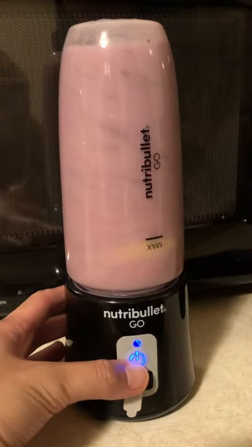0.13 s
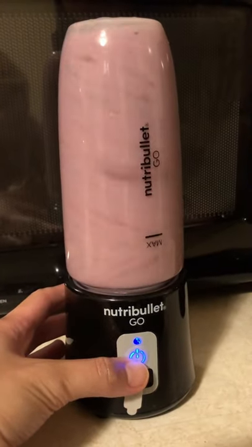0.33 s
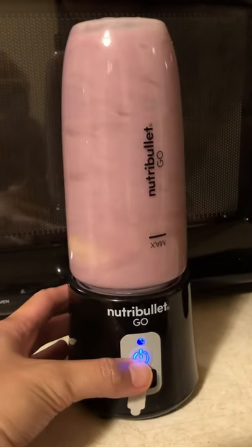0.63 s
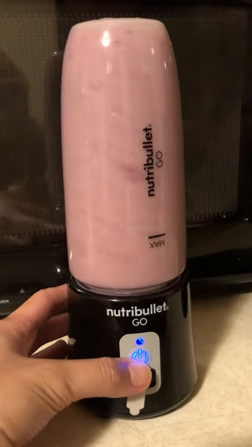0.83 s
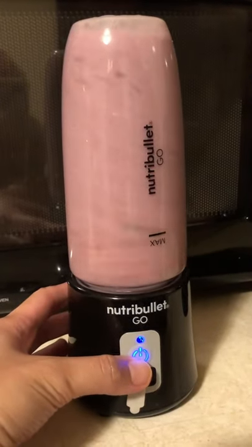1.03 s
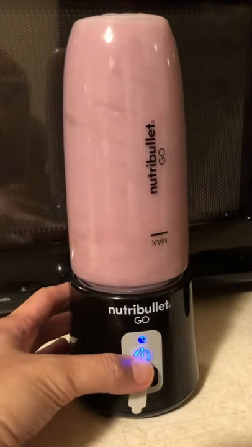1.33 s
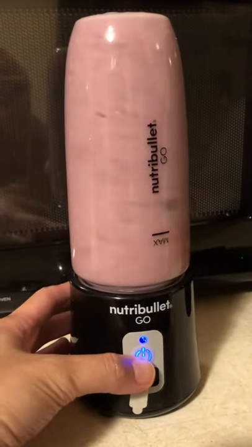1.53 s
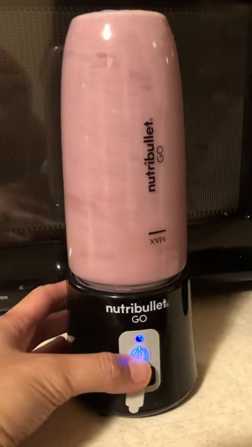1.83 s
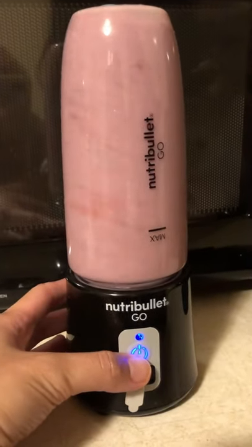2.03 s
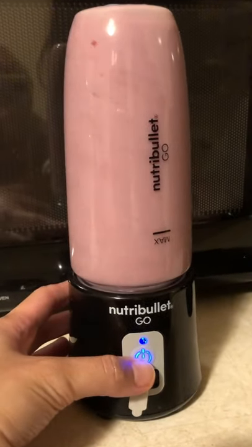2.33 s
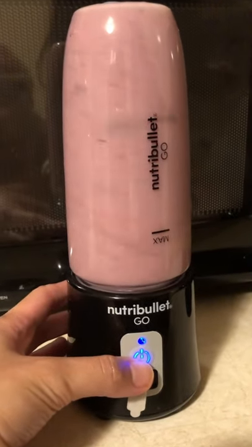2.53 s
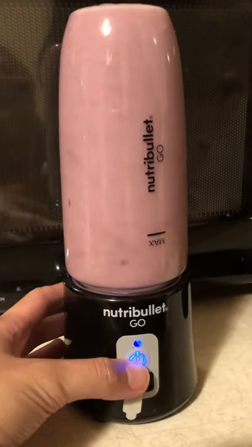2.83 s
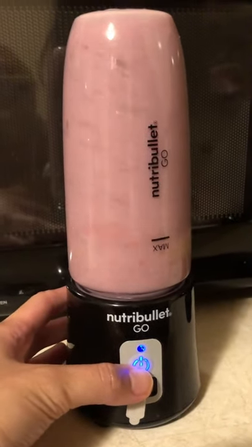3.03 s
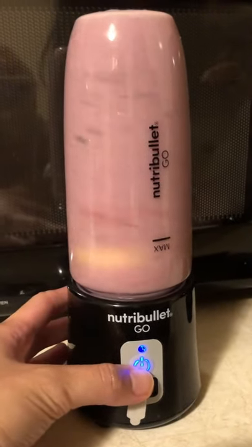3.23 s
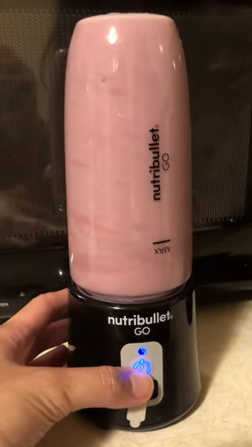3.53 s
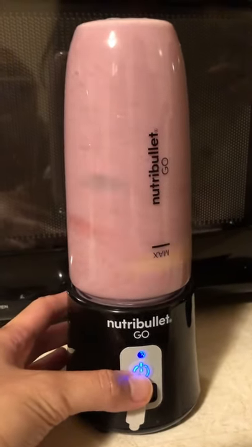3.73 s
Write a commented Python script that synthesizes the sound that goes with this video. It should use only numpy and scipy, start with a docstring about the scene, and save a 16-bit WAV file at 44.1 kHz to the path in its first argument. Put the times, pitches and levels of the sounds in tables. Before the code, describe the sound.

A small cordless blender runs continuously on a kitchen counter, already going at the start; fruit bits knock the full jar in uneven, buzzing bursts over a bright motor whir, recorded close and fairly dry.

```python
"""On a kitchen counter, close by, a small cordless blender churns a thick smoothie.
The blade turns some 220 times a second; each bite into fruit drags it, knocks the full jar once a turn and crunches.
Under the bites every turn rattles lightly, pulp patters on the jar, liquid swirls and one tiny tick cracks.
The motor whirs through filtered noise with a short answer from the walls, the housing sings in narrow modes,
the shaft hums as wavering sines and the base shakes on the counter."""
import sys
import numpy as np
from scipy import signal
from scipy.fft import rfft, irfft, next_fast_len
from scipy.io import wavfile
from scipy.ndimage import map_coordinates

SR = 44100
rng = np.random.default_rng(int(sys.argv[2]) if len(sys.argv) > 2 else 0)


def digitize_waveform(pressure):
    """Quantize a signal to 16-bit integers and store it at the path in sys.argv[1].

    Rows of a 2-D input are taken as channels; values are limited to [-1, 1].
    """
    field = np.atleast_2d(pressure).T
    bounded = np.clip(field, -1, 1)
    quanta = np.round(bounded * 32767).astype(np.int16)
    wavfile.write(sys.argv[1], SR, quanta)


N = 171549  # length in samples


def amp(db):
    """Decibels to gain."""
    return 10 ** (np.asarray(db) / 20)


def unit(x):
    """Scale to rms 1."""
    return x / np.sqrt(np.mean(x ** 2) + 1e-20)


def curve(rows):
    """Automation: (seconds, value) points joined by straight lines."""
    return np.interp(np.arange(N) / SR, *np.transpose(rows))


def wobble(rate):
    """A smooth random curve with this many knots a second."""
    knots = rng.standard_normal(int(N * rate / SR) + 4)
    return map_coordinates(knots, [np.arange(N) * rate / SR])


def ring(points, size=8192):
    """Minimum-phase impulse response of energy 1 with a colour given as (Hz, dB) points."""
    hz, db = np.transpose(points)
    bins_hz = np.fft.rfftfreq(size, 1 / SR)
    gain = amp(np.interp(np.log(bins_hz + 1), np.log(hz + 1), db))
    # folding the cepstrum forward makes the response causal
    cepstrum = irfft(np.log(np.maximum(gain, 1e-6)))
    cepstrum[1:size // 2] *= 2
    cepstrum[size // 2 + 1:] = 0
    response = irfft(np.exp(rfft(cepstrum)))
    return response / np.linalg.norm(response)


def resonance(hz, width_hz):
    """Impulse response of one mode: a sine that dies faster the wider the resonance."""
    t = np.arange(SR // 3) / SR
    return np.sin(2 * np.pi * hz * t) * np.exp(-np.pi * width_hz * t)


def through(x, response):
    """x sounding through an impulse response."""
    return signal.fftconvolve(x, response)[:N]


def bell(t, length):
    """Swell and fade, 3 dB down at length / 2 from the centre."""
    return np.exp2(-2 * np.minimum((t / length) ** 2, 20))


# Bites into fruit. Each row: time of the hardest knock in seconds, length in seconds, relative level in dB,
# turns per second in Hz.
BITES = [(0.03, 0.02103, -13, 207.4), (0.0716, 0.0182, -11, 203.4), (0.1203, 0.0533, -21, 208.7),
         (0.169, 0.0086, -13, 203.3), (0.183, 0.0095, -7, 208.5), (0.2445, 0.0077, -9.5, 198),
         (0.252, 0.0198, -15.5, 197.6), (0.301, 0.0099, -12.5, 203.3), (0.4307, 0.026, -16.5, 211.6),
         (0.442, 0.0137, -16, 205.9), (0.6085, 0.023, -14, 207.8), (0.8235, 0.0542, -19, 215.5),
         (0.8407, 0.026, -16, 218.5), (0.961, 0.0085, -17, 214), (0.986, 0.00837, -11, 209),
         (1.045, 0.008, -15, 213), (1.2214, 0.0097, -13.5, 216.6), (1.2358, 0.01575, -12.5, 207.2),
         (1.2484, 0.012, -12, 205.7), (1.317, 0.00825, -18, 212.5), (1.323, 0.01048, -16.5, 208.3),
         (1.448, 0.00818, -10, 208), (1.498, 0.014, -11, 203.9), (1.715, 0.029, -15.5, 211.6),
         (1.7394, 0.016, -11, 210.8), (1.7695, 0.0075, -11.5, 205), (1.9213, 0.0081, -8.5, 216.8),
         (1.97, 0.00726, -16, 233.1), (2.101, 0.029, -16.5, 204.3), (2.378, 0.0074, -17, 225.2),
         (2.4, 0.01, -12, 221), (2.434, 0.0107, -13, 225.2), (2.4398, 0.016, -13.5, 217.1),
         (2.5613, 0.02054, -18.5, 206.5), (2.781, 0.02095, -16, 223.3), (2.799, 0.014, -11, 213),
         (3.0358, 0.02, -16.5, 216.5), (3.05, 0.0388, -19.5, 218.1), (3.173, 0.014, -13.5, 201.9),
         (3.5615, 0.008, -16, 224.7), (3.661, 0.0333, -17, 207.8), (3.7098, 0.0077, -10, 210.4),
         (3.7316, 0.0243, -19.5, 209.5), (3.8728, 0.0078, -12.5, 200.9)]


def bite_swells():
    """Strength of each bite over time, one row a bite."""
    t = np.arange(N) / SR
    return np.array([amp(db) * bell(t - s, length) for s, length, db, hz in BITES])


FREE_HZ, DRIFT_HZ = 235.45, 3  # shaft speed unloaded and its random drift
INERTIA_S, GRIP = .06, 9  # how much longer than the bite the drag lasts, and how firm it is


def shaft_angle():
    """Each bite drags the shaft from its free speed towards the bite's own; summed speed gives the angle."""
    t = np.arange(N) / SR
    top_db = max(row[2] for row in BITES)
    total, weight = FREE_HZ + DRIFT_HZ * wobble(14), 1
    for s, length, db, hz in BITES:
        drag = GRIP * amp(2 * (db - top_db)) * bell(t - s, length + INERTIA_S)
        total, weight = total + drag * hz, weight + drag
    return 2 * np.pi * np.cumsum(total / weight) / SR


# Colour of the jar under hard knocks. Each row: frequency in Hz, relative level in dB.
KNOCK_COLOUR = [(200, -49.5), (400, -35.5), (520, -20.5), (630, -14), (730, -20), (850, -7.5), (950, 0),
                (1060, 2), (1160, 0.5), (1270, -4), (1500, -14.5), (2200, -29), (2700, -24), (3400, -29),
                (4600, -56.5), (6200, -34), (9000, -53), (15000, -57)]
KNOCK_DB, KNOCK_SCATTER_DB, KNOCK_JITTER_S = -0.7, 1.05, .00002


def knocks(swells, force, count=8):
    """In a bite the blade knocks the jar once a turn; where bites overlap the stronger sets the beat."""
    blows = np.zeros(N)
    turns = np.arange(-count, count + 1)
    leader = swells.argmax(0)
    for i, (s, length, db, hz) in enumerate(BITES):
        size, slip = rng.standard_normal((2, len(turns)))
        seconds = s + turns / hz + KNOCK_JITTER_S * slip
        at = np.clip(np.round(seconds * SR).astype(int), 0, N - 1)
        gain = amp(KNOCK_DB + KNOCK_SCATTER_DB * size)
        # the root keeps the power equal whatever the knock rate
        blows[at] += (leader[at] == i) * force[at] * gain * np.sqrt(SR / hz)
    return through(blows, ring(KNOCK_COLOUR))


# Colour of hard bits crunching. Each row: frequency in Hz, relative level in dB.
CRUNCH_COLOUR = [(1500, -20), (2700, 8), (4800, -14), (6300, 4), (8400, -3), (11000, -4.5), (15500, -24)]
CRUNCH_DB, CRUNCH_PER_S = -31.5, 1200


def crunch(load):
    """Hard bits crackle brightly at random, as loud as the blade is loaded."""
    bits = (rng.random(N) < CRUNCH_PER_S / SR) * rng.standard_normal(N)
    return amp(CRUNCH_DB) * through(unit(bits) * load, ring(CRUNCH_COLOUR))


# Colour of the jar under light knocks and pulp. Each row: frequency in Hz, relative level in dB.
JAR_COLOUR = [(180, -64.5), (300, -32.5), (376, -30.5), (436, -23.5), (510, -19), (634, -12.5), (735, -16),
              (845, -9), (922, -5), (1070, 3), (1160, 0.5), (1250, -2), (1500, -13), (1790, -16),
              (1960, -11.5), (2200, -22), (2400, -23), (3120, -50), (5280, -120)]
# Shared level of rattle and pulp. Each row: time in seconds, relative level in dB.
PATTER_LEVEL = [(0.0, -19), (0.19, -19.5), (0.49, -21), (0.9, -19.5), (1.19, -21), (1.62, -20),
                (1.72, -20.5), (2.45, -20.5), (2.96, -20.5), (3.7, -20.5), (3.89, -23)]
RATTLE_DB, RATTLE_SPREAD_DB, RATTLE_JITTER_S = -5.5, 6.5, 0.00014


def rattle(angle):
    """Every turn of the shaft gives the jar a light knock of very uneven size."""
    turn = np.flatnonzero(np.diff(angle // (2 * np.pi)))
    size, slip = rng.standard_normal((N // 100, 2))[:len(turn)].T
    at = np.clip(turn + np.round(RATTLE_JITTER_S * SR * slip).astype(int), 0, N - 1)
    blows = np.bincount(at, amp(RATTLE_SPREAD_DB * np.minimum(size, 2)), N)
    return amp(curve(PATTER_LEVEL) + RATTLE_DB) * unit(through(blows, ring(JAR_COLOUR)))


PULP_DB, PULP_PER_S, PULP_SPREAD_DB, PULP_TURN_DB = -1.13, 4000, 2, -1.5


def pulp(angle):
    """Small bits hit the jar at random, harder on one side of each turn."""
    hits = (rng.random(N) < PULP_PER_S / SR) * rng.choice([-1, 1], N)
    size = amp(PULP_SPREAD_DB * rng.standard_normal(N) + PULP_TURN_DB * np.cos(angle))
    return amp(curve(PATTER_LEVEL) + PULP_DB) * unit(through(hits * size, ring(JAR_COLOUR)))


WALLS_DB, WALLS_T60_S = -6, 0.04  # answer against the direct sound, and its time to fall 60 dB


def walls(x):
    """Add the short answer of the counter and nearby surfaces, a decaying noise tail."""
    t = np.arange(SR // 4) / SR
    tail = rng.standard_normal(len(t)) * amp(-60 * t / WALLS_T60_S)
    return x + amp(WALLS_DB) * through(x, tail / np.linalg.norm(tail))


# Colour of the motor's whir. Each row: frequency in Hz, relative level in dB.
WHIR_COLOUR = [(1290, -22), (2200, -12), (2370, -12), (2630, -1.5), (2910, -4), (3450, 1), (3780, -5.5),
               (4410, -10.5), (5240, -12.5), (5690, -7.5), (6380, -7.5), (7450, -14.5), (8490, -15.5),
               (9000, -16.5), (9530, -14), (10400, -21.5), (10900, -23), (14200, -26.5), (14900, -28),
               (15600, -32)]
# Level of the whir. Each row: time in seconds, relative level in dB.
WHIR_LEVEL = [(0.0, -31), (0.02, -30), (0.41, -29), (0.51, -31), (0.62, -27.5), (0.68, -31), (0.89, -27.5),
              (0.9, -29.5), (1.44, -29.5), (1.49, -27), (1.53, -29.5), (3.89, -29)]
WHIR_DB, WHIR_TURN_DB, WHIR_FLUTTER_DB = -1, 2, 1.17
LOAD_DB = 3  # rise of whir and housing at full load


def whir(angle, load):
    """Motor and blade hiss through the housing, pulsing with the shaft and rising under load."""
    drive_db = WHIR_TURN_DB * np.cos(angle) + WHIR_FLUTTER_DB * wobble(160) + LOAD_DB * load
    hiss = through(rng.standard_normal(N) * amp(drive_db), ring(WHIR_COLOUR))
    return amp(curve(WHIR_LEVEL) + WHIR_DB) * unit(walls(hiss))


# Narrow resonances of the housing. Each row: frequency in Hz, width in Hz, relative level in dB.
HOUSING_MODES = [(662.3, 23, -42), (1588, 27, -43), (1944, 22, -40), (2627, 110, -48.5), (3478, 97, -39),
                 (4020, 110, -45), (6350, 100, -47.5), (6800, 44, -49.5), (8380, 130, -44.5),
                 (9190, 120, -52), (11030, 100, -55), (12270, 120, -57), (15300, 160, -56.5)]
HOUSING_DB, HOUSING_WAVER_DB = -1.5, 1.5


def housing(load):
    """The motor, as noise, keeps the housing's resonances singing, a little more under load."""
    modes = np.zeros(N)
    for hz, width_hz, db in HOUSING_MODES:
        level = amp(db + HOUSING_WAVER_DB * wobble(3.84))
        modes += level * unit(through(rng.standard_normal(N), resonance(hz, width_hz)))
    return amp(HOUSING_DB + LOAD_DB * load) * modes


# Colour of the swirling liquid. Each row: frequency in Hz, relative level in dB.
SWIRL_COLOUR = [(15, -63), (25, -39), (41, -20), (54, -0.5), (70, 0), (128, -5), (156, 0.5), (168, 0.5),
                (195, -11.5), (232, -2.5), (263, -14), (400, -6.5), (520, -44), (880, -120)]
SWIRL_DB = -49


def swirl():
    """The liquid swirls as low, steady filtered noise."""
    return amp(SWIRL_DB) * unit(through(rng.standard_normal(N), ring(SWIRL_COLOUR)))


# Hum of the shaft. Each row: multiple of the shaft speed, relative level in dB.
HUM_PARTIALS = [(1, -12), (2, -11), (3, -0.5)]
HUM_DB, HUM_WAVER_DB = -44, 3.5


def hum(angle):
    """The shaft hums at multiples of its speed, each partial wavering on its own."""
    total = np.zeros(N)
    for order, db in HUM_PARTIALS:
        partial = np.sin(order * angle) * amp(HUM_WAVER_DB * wobble(25.12))
        total += amp(db) * unit(partial)
    return amp(HUM_DB) * total


# Level of the base shaking on the counter. Each row: time in seconds, relative level in dB.
BASE_LEVEL = [(0, 6), (.2, 13), (.4, -4.5), (1.2, 1.5), (2.1, 4), (2.7, -8), (3.2, 0), (3.89, -12)]
BASE_HZ, BASE_WIDTH_HZ, BASE_DB = 160.6, 12, -53.5


def base():
    """The base shakes on the counter: noise through one low mode."""
    shake = unit(through(rng.standard_normal(N), resonance(BASE_HZ, BASE_WIDTH_HZ)))
    return amp(BASE_DB + curve(BASE_LEVEL)) * shake


# A tiny tick, perhaps a seed on the jar. Each row: start in seconds, relative level in dB.
TICKS = [(0.8535, -11.5)]
TICK_T60_S = 0.0049  # time to fall 60 dB


def ticks():
    """A tiny bright crack: differenced noise that starts at once and dies away."""
    t, out = np.arange(N) / SR, np.zeros(N)
    for s, db in TICKS:
        crack = np.diff(rng.standard_normal(N + 1)) / 4
        out += amp(db - 60 * np.abs(t - s) / TICK_T60_S) * (t >= s) * crack
    return out


def scene():
    """Bites knock, drag the shaft that paces rattle, pulp, whir and hum, and load crunch, whir and housing."""
    swells = bite_swells()
    force = np.linalg.norm(swells, axis=0)
    load = force / force.max()
    angle = shaft_angle()
    jar = knocks(swells, force) + crunch(load) + rattle(angle) + pulp(angle) + ticks()
    motor = whir(angle, load) + housing(load)
    rumble = swirl() + hum(angle) + base()
    return (jar + motor + rumble)[None]


LOW_CUT_HZ, TOP_HZ = 46, 15750


def record(dry):
    """The microphone rounds off the highest peaks, drops the deep bass and keeps nothing above its band limit."""
    size = next_fast_len(N + SR // 2)
    hz = np.fft.rfftfreq(size, 1 / SR)
    rounded = dry / (1 + np.abs(dry / .97) ** 8) ** (1 / 8)  # never exceeds .97
    bass = 1 - 1 / (1 + (hz / LOW_CUT_HZ) ** 8)
    return irfft(rfft(rounded, size) * bass * (hz < TOP_HZ), size)[..., :N]


dry = scene()
out = record(dry)
digitize_waveform(out)
```